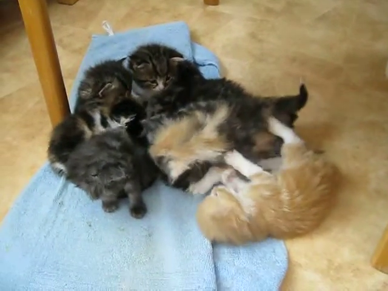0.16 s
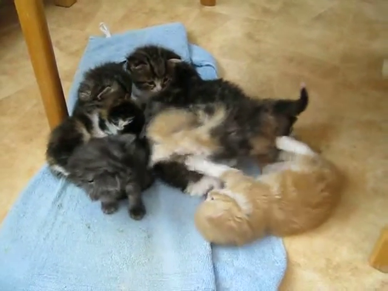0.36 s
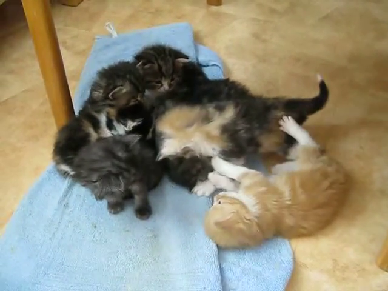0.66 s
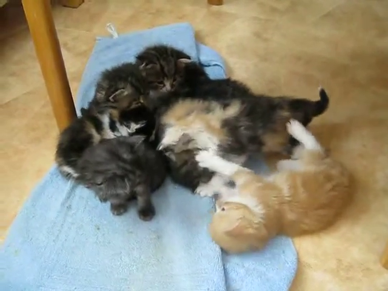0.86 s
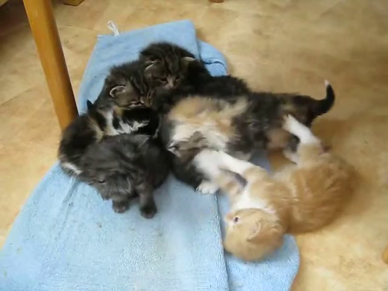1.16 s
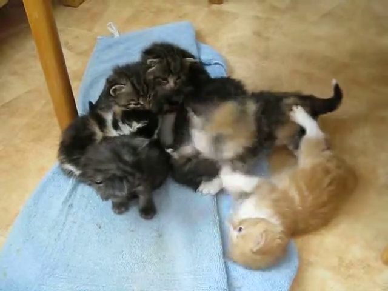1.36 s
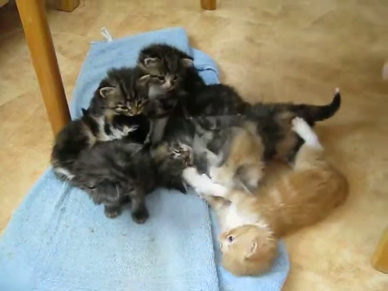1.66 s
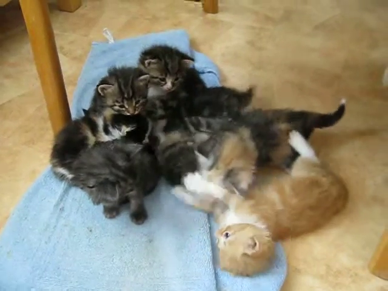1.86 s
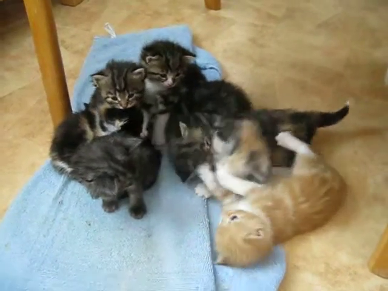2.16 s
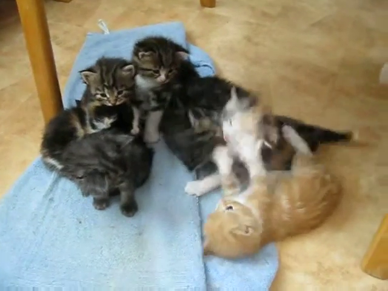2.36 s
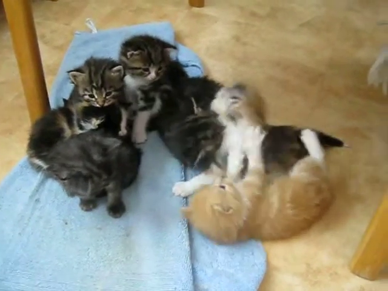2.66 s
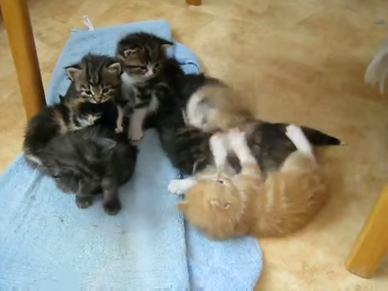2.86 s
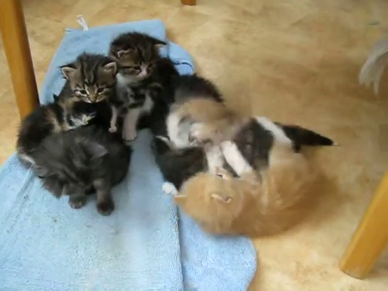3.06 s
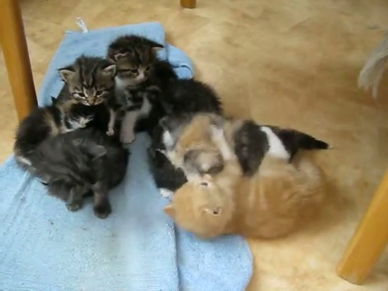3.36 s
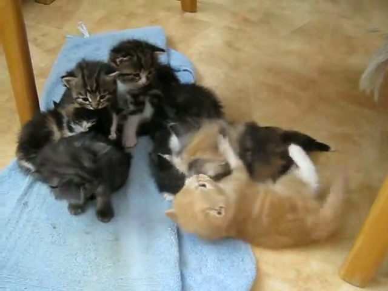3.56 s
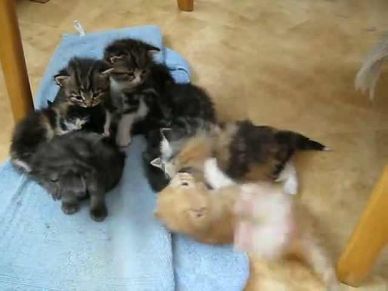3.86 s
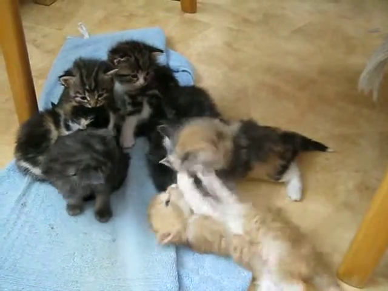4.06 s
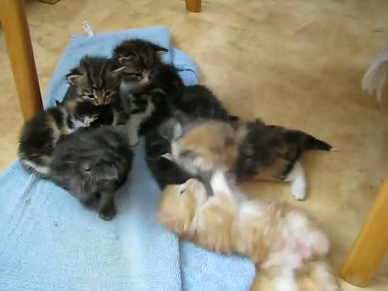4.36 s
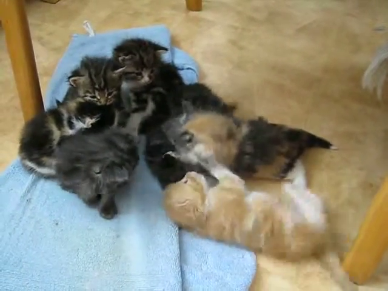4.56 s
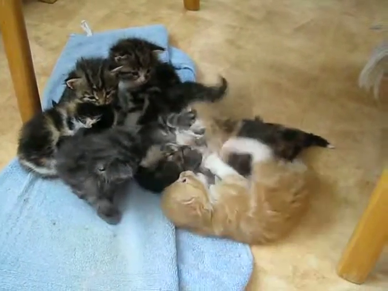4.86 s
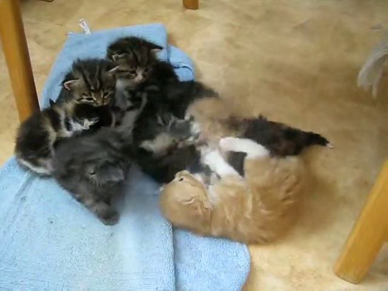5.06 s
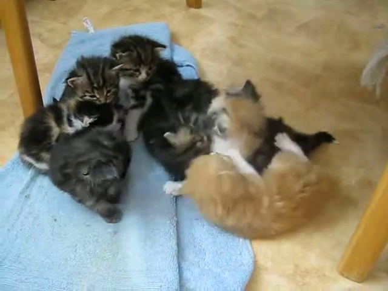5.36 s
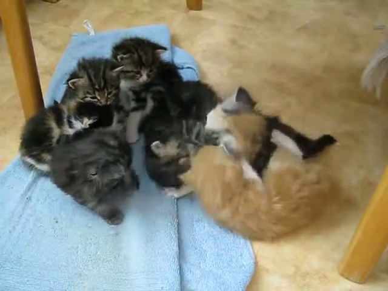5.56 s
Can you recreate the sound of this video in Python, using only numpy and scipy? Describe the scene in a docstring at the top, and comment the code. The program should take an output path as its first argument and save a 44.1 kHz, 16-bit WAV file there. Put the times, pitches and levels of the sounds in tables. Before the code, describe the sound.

Close to a small camera microphone in a bare, hissing room, kittens rub softly over a towel. Something wooden out of sight is knocked hard three times in the first half, each blow ringing in the room, with a brief bright scuff after the first. Claws tick; lighter knocks and a fizzing scrape follow, a faint distant engine hum rises in pitch, and the rustling swells at the end.

```python
"""Kittens wrestle on a towel on a hard floor, close to a small camera's microphone, in a bare hissing room.
From the start fur and cloth rustle as shaped noise and a far engine hums as two tones behind the walls.
Out of sight something wooden is knocked hard three times, resonant noise that the room carries on, with a
brief treble scuff after the first; claws tick. Then come lighter knocks, one with a fizzing scrape, while the
engine, after a sag, speeds up; the rustle swells at the end. The camera's gain control ducks the loudest blows."""
import sys
import numpy as np
from scipy import signal
from scipy.fft import rfft, irfft, next_fast_len
from scipy.io import wavfile
from scipy.ndimage import map_coordinates

SR = 44100
rng = np.random.default_rng(int(sys.argv[2]) if len(sys.argv) > 2 else 0)


def log_audio(samples):
    """Write samples as a 16-bit WAV file to the path given in sys.argv[1]."""
    # one column per channel
    frames = np.atleast_2d(samples).T
    # limit to full scale, then quantise
    limited = np.clip(frames, -1, 1)
    pcm = np.round(limited * 32767).astype(np.int16)
    wavfile.write(sys.argv[1], SR, pcm)


N = 251349


def amp(db):
    """Decibels to gain."""
    return 10 ** (np.asarray(db) / 20)


def unit(x):
    """x at rms 1."""
    return x / np.sqrt(np.mean(x ** 2) + 1e-20)


def along(points, hz):
    """(hz, value) points read on a log frequency axis."""
    point_hz, values = np.transpose(points)
    return np.interp(np.log(hz + 1), np.log(point_hz + 1), values)


def curves(rows):
    """One value per sample for each column after the time."""
    times_s, *columns = np.transpose(rows)
    return [np.interp(np.arange(N) / SR, times_s, column) for column in columns]


def wobble(rate, size=N):
    """A smooth random curve, rate knots a second."""
    knots = rng.standard_normal(int(size * rate / SR) + 4)
    return map_coordinates(knots, [np.arange(size) * rate / SR])


def filtered(x, response):
    """x times a response of frequency."""
    size = next_fast_len(len(x) + SR // 4)  # padded so that the end does not wrap onto the start
    spectrum = rfft(x, size) * response(np.fft.rfftfreq(size, 1 / SR))
    return irfft(spectrum, size)[:len(x)]


def add(track, start_s, sound):
    """Mix a sound into the track at start_s."""
    part = track[round(start_s * SR):][:len(sound)]
    part += sound[:len(part)]


def bump(hz, centre_hz, width_hz):
    """A resonance curve of height 1."""
    return 1 / (1 + (2 * (hz - centre_hz) / width_hz) ** 2)


# The steady noise's relative spectrum: columns hz, level_db (per Hz)
HISS_SPECTRUM = [(15, -36), (25, -10), (79, -10.5), (140, -5.5), (359, -8), (482, -9), (523, -8),
                 (871, -10.5), (1410, -11), (3830, -21.5), (6550, -24.5), (7910, -34), (9050, -29.5),
                 (15500, -39)]
HISS_DB = -54.5  # rms


def hiss():
    """The steady noise of room and microphone: random noise with a fixed spectrum."""
    noise = rng.standard_normal(N)
    return amp(HISS_DB) * unit(filtered(noise, lambda hz: amp(along(HISS_SPECTRUM, hz))))


# The far engine idles, sags under load, then speeds up: columns time_s, firing_hz
ENGINE_SPEED = [(0, 107.8), (2.0, 110.3), (2.7, 102), (4.6, 141.9), (5.05, 148.6), (5.7, 155.1)]
IDLE_HZ, IDLE_DB, LOUDER_DB_PER_HZ = 107.3, -72.5, 0.23  # it grows louder with speed


def engine(upper_db=-7, waver_db=2):
    """Only two low orders of the engine, sines locked to its shaft, come through the walls."""
    firing_hz, = curves(ENGINE_SPEED)
    level_db = IDLE_DB + LOUDER_DB_PER_HZ * (firing_hz - IDLE_HZ)
    shaft = np.pi * np.cumsum(firing_hz) / SR  # shaft angle in radians: two firings a turn
    firing = amp(waver_db * wobble(15)) * np.sin(2 * shaft)
    third_gain = amp(upper_db + waver_db * wobble(3.4))
    third = third_gain * np.sin(3 * shaft)
    return amp(level_db) * np.sqrt(2) * (firing + third)


# Relative spectrum of fur on cloth: columns hz, level_db (per Hz)
CLOTH_SPECTRUM = [(300, -2.5), (1000, 3.5), (2500, 3), (5500, -1), (9000, -6), (15000, -6.5)]
# Bodies rolling over the towel: columns middle_s, length_s (between the 1/e points of power), level_db
ROLLS = [(.53, 0.35, -55), (1.043, 0.091, -58), (1.543, 0.47, -54.5), (4.604, 0.32, -59.5),
         (5.8, 0.63, -45)]
FIDGET_DB = -57  # fur never quite stops rubbing on the towel


def rustle(uneven_db=0.56):
    """Fur slides over the towel: noise of constant fidgeting, and a smooth swell for each roll."""
    t = np.arange(N) / SR
    power = amp(FIDGET_DB) ** 2
    for middle_s, length_s, level_db in ROLLS:
        power = power + amp(level_db) ** 2 * np.exp(-(2 * (t - middle_s) / length_s) ** 2)
    fibres = rng.standard_normal(N) * amp(uneven_db * wobble(22.1))
    cloth = unit(filtered(fibres, lambda hz: amp(along(CLOTH_SPECTRUM, hz))))
    return np.sqrt(power) * cloth


# How long the bare room rings: columns hz, t60_s (time to fall by 60 dB)
ROOM_DECAY = [(120, 0.39), (400, 0.35), (1300, 0.37), (4500, 0.36), (12000, 0.25)]


def echoes(spiky, merge_s):
    """Half a second of room echoes: distinct at first, then merging, each band dying at its own rate."""
    t = np.arange(SR // 2) / SR
    spread = spiky * np.exp(-t / merge_s)
    uneven = np.exp(spread * rng.standard_normal(len(t)) - spread ** 2)
    arrivals = rng.standard_normal(len(t)) * uneven
    hz, age_s, bands = signal.stft(arrivals, SR, nperseg=256)
    decay_db = -60 * age_s / along(ROOM_DECAY, hz)[:, None]
    return signal.istft(bands * amp(decay_db), SR, nperseg=256)[1][:len(t)]


# Claws and paws near the camera: columns start_s, level_db (before the fade and soft rise), centre_hz, t60_s
PAW_TAPS = [ (0.806, -51, 3100, .14), (1.957, -49, 2640, .036), (3.2196, -28, 1760, 0.011),
            (3.866, -45.5, 3180, 0.086), (3.943, -37, 360, 0.087), (3.943, -36.5, 1480, 0.032),
            (3.991, -48.5, 3350, 0.091), (5.186, -37.5, 1070, 0.046), (5.599, -40.5, 1490, 0.088),
            (5.675, -43.5, 2800, .12)]
TAP_OCTAVES = 0.65  # standard deviation of a tap's band


def taps(room_db=-11):
    """Claws and paws strike the floor: short bands of noise, nearly dry this close to the microphone."""
    track, t = np.zeros(N), np.arange(SR // 4) / SR
    for start_s, level_db, centre_hz, t60_s in PAW_TAPS:
        def band(hz):
            """A bell curve over octaves."""
            octaves = np.log2((hz + 1) / centre_hz)
            return np.exp(-.5 * (octaves / TAP_OCTAVES) ** 2)
        tick = unit(filtered(rng.standard_normal(len(t)), band))
        rise = 1 - np.exp(-t * centre_hz)  # a soft pad takes about a cycle to press home
        add(track, start_s, amp(level_db - 60 * t / t60_s) * rise * tick)
    tail = echoes(spiky=0.46, merge_s=0.025)
    reflected = signal.fftconvolve(track, tail / np.linalg.norm(tail))[:N]
    return track + amp(room_db) * reflected


# Narrow rings, and a fizzing scrape (the 9800 Hz row), that go with some knocks:
# columns start_s, centre_hz, level_db (before swell and fade)
RINGS_AND_SCRAPE = [ (0.476, 1910, -28), (0.880, 3770, -51), (1.372, 252, -27), (1.380, 464.5, -21.5),
                    (2.867, 1010, -49.5), (3.27, 1037, -45), (3.469, 376, -37.5), (3.482, 9800, -48),
                    (3.492, 3470, -40), (4.576, 476, -40.5), (4.710, 5960, -39.5), (4.712, 459, -41)]


def rings_and_scrape(ring_q=9, swell_s=0.0043):
    """Randomly modulated carriers: narrow rings when low, a broad fizz when high; all fade with the room."""
    track, t = np.zeros(N), np.arange(SR // 2) / SR
    for start_s, centre_hz, level_db in RINGS_AND_SCRAPE:
        rate = centre_hz / ring_q  # the band widens with its centre
        fading = wobble(rate, size=len(t)) + 1j * wobble(rate, size=len(t))
        band = unit(np.real(fading * np.exp(2j * np.pi * centre_hz * t)))
        swell = 1 - np.exp(-t / swell_s)
        decay = amp(level_db - 60 * t / along(ROOM_DECAY, centre_hz))
        add(track, start_s, swell * decay * band)
    return track


# Knocks and scuffs across the room (the row at 0.685 s is a brief treble scuff): columns start_s,
# level_db (before colour and build-up), heavy_db (extra bass), hard_db (extra treble)
KNOCKS_AND_SCUFFS = [ (0.473, -20.5, 2, -3.5), (0.685, -64.5, 2, 31.5), (0.879, -46.5, -4, 4.5),
                     (1.358, -24.5, 0.5, -2.5), (1.378, -18, -1.5, 11), (2.366, -20, 5, 4.5),
                     (2.371, -22, 14.5, 22.5), (2.869, -50, -8, -1), (3.273, -45, -15, -13),
                     (3.465, -35.5, -11, -4), (3.477, -33, -10, -3), (3.671, -47.5, 6, -1),
                     (3.692, -29, -10, -11.5), (4.472, -55, 12, 17), (4.516, -51.5, 4, 6),
                     (4.576, -41, 2, 2.5), (4.708, -41.5, 15, 21), (5.184, -42, -11, 3)]
# Resonances of the wood: columns centre_hz, width_hz, lift_db
WOOD_RESONANCES = [(149, 45, 5.5), (206, 74, -7.5), (254.6, 30, 8), (318, 6.6, -1.5), (470, 59, 0.5),
                   (560, 31, 4), (684.5, 9, 8.5), (1180, 16, 5.5), (1320, 60, 3), (1440, 290, -4),
                   (1820, 47, 1.5), (2770, 42, 5), (3410, 410, 2), (5450, 720, 3)]
# Colour of an ordinary contact: columns hz, level_db (per octave, relative to the contact's level)
CONTACT_COLOUR = [(140, -21), (400, -2), (1300, 0.5), (4500, -8), (12000, -17.5)]
HEAVY_HZ, HARD_HZ = 410, 3180  # weight adds bass below the first, hardness adds treble above the second
BUILD_S, BUILD_DOUBLING_DB = 0.023, 19.5  # build-up at 0 dB; it halves for each such step weaker


def knocks_and_scuffs(lowest_hz=125, ripple_db=1.0):
    """Room echoes coloured by wood resonances: boomy if heavy, bright if hard, a scuff if nearly all treble."""
    track, t = np.zeros(N), np.arange(SR // 2) / SR
    for start_s, level_db, heavy_db, hard_db in KNOCKS_AND_SCUFFS:
        strengths = rng.standard_normal(600)

        def colour(hz):
            """Gain per Hz of this contact."""
            bass = 1 / (1 + (hz / HEAVY_HZ) ** 4)
            treble = 1 - 1 / (1 + (hz / HARD_HZ) ** 2)
            contact_db = level_db + along(CONTACT_COLOUR, hz) + heavy_db * bass + hard_db * treble
            per_hz = np.sqrt(SR / 2 / np.log(2) / (hz + 1))  # from level per octave
            wood_db = sum(lift_db * bump(hz, centre_hz, width_hz)
                          for centre_hz, width_hz, lift_db in WOOD_RESONANCES)
            ripple = map_coordinates(strengths, [3 * np.sqrt(hz)])
            crowded_db = ripple_db * ripple * hz / (hz + 900)  # high modes, excited unevenly
            return amp(contact_db) * per_hz * amp(wood_db + crowded_db)

        body = filtered(echoes(spiky=0.78, merge_s=0.015), colour)
        build_s = BUILD_S * 2 ** (level_db / BUILD_DOUBLING_DB)
        add(track, start_s, (1 - np.exp(-t / build_s)) * body)  # reflections pile up
    radiation = signal.butter(6, lowest_hz, "high", fs=SR, output="sos")  # little bass leaves the wood
    return signal.sosfilt(radiation, track)


def scene():
    """Everything as it reaches the one microphone."""
    return (knocks_and_scuffs() + rings_and_scrape() + taps() + rustle() + engine() + hiss())[None]


def gain_control(x):
    """Loud blows get through for a moment, then are held down until they have died away."""
    threshold_db, lag_s = -21, .015
    power = signal.lfilter(*signal.butter(1, 60, fs=SR), x ** 2)
    excess_db = np.maximum(10 * np.log10(np.abs(power) + 1e-12) - threshold_db, 0)
    step = 1 / (lag_s * SR)
    reduction_db = signal.lfilter([step], [1, step - 1], excess_db)  # the gain lags the level
    return x * amp(-reduction_db)


NOTCH_HZ, TOP_HZ = 7900, 15780  # the camera's treble notch and band limit


def record(dry, notch_width_hz=800):
    """The camera rides its gain, has a deep notch in the treble and keeps nothing above its band limit."""
    def response(hz):
        """The notch, cut off at the band limit."""
        offset_hz = hz - NOTCH_HZ
        notch = np.abs(offset_hz) / np.hypot(offset_hz, notch_width_hz)
        return notch * (hz < TOP_HZ)
    return filtered(gain_control(dry[0]), response)[None]


dry = scene()
out = record(dry)
log_audio(out)
```